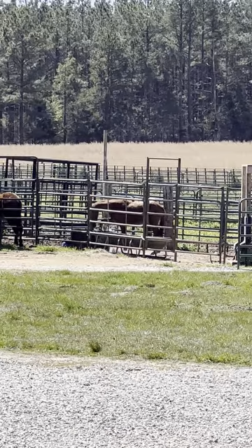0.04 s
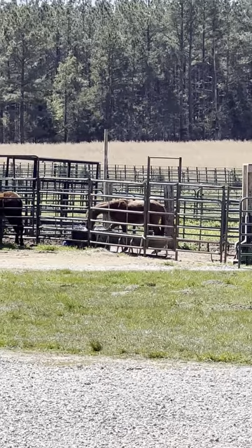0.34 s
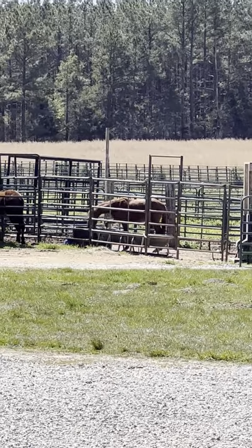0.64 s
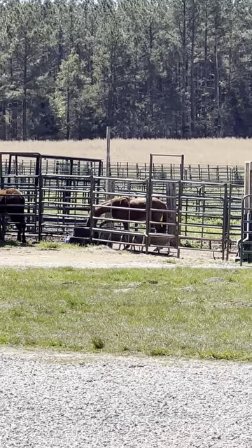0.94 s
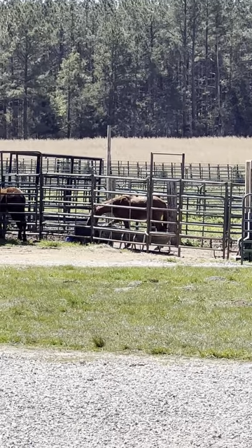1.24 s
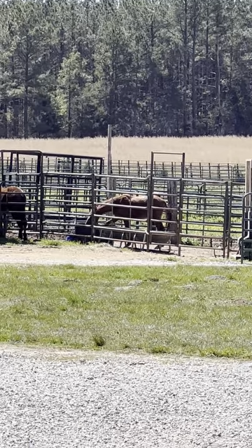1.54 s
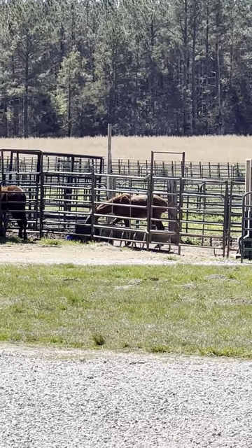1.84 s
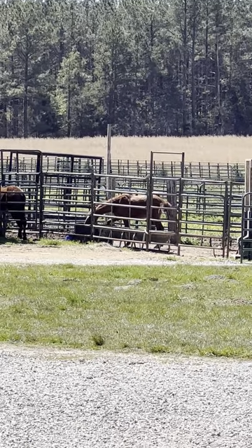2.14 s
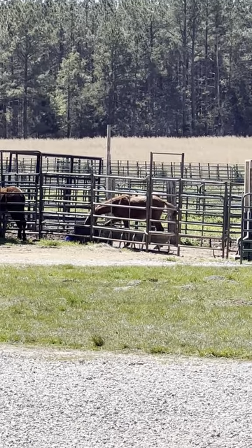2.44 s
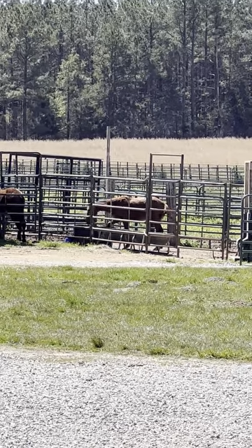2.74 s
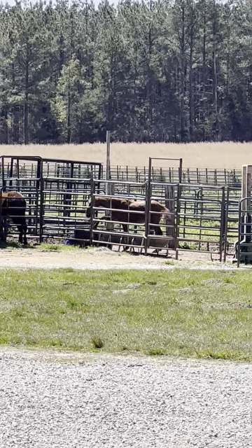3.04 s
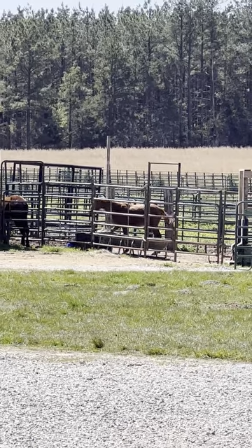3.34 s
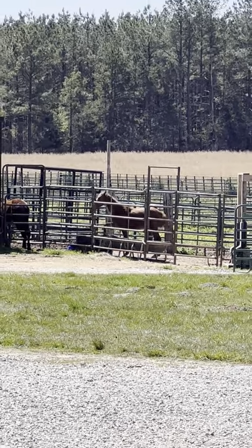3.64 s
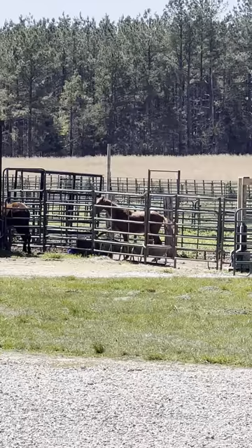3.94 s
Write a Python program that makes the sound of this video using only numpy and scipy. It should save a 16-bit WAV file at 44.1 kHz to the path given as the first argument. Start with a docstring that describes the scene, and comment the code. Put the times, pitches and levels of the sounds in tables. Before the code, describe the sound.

Faint splashing and knocks as a horse paws a distant water trough, with wind rumble.

```python
"""A yard ringed by buildings and trees, with a stereo microphone far from the water trough.
A horse paws the water, which splashes, heaves and gulps, and knocks the trough, three times clearly;
the trough rings and the yard throws the knocks back. A faint low hum sinks away early on, and a small
bird gives a few thin chirps. Wind brushes the microphone at the start and buffets it from about halfway."""
import sys
import numpy as np
from scipy import signal
from scipy.fft import rfft, irfft
from scipy.io import wavfile
from scipy.ndimage import uniform_filter1d

SR = 44100
rng = np.random.default_rng(int(sys.argv[2]) if len(sys.argv) > 2 else 0)


def bounce(signal):
    """Save signal as a 16-bit WAV file at the path given by the first command-line argument."""
    frames = np.transpose(np.atleast_2d(signal))
    limited = np.clip(frames, -1, 1)
    pcm = np.round(limited * 32767).astype(np.int16)
    wavfile.write(sys.argv[1], SR, pcm)


N = 4 * SR


def amp(db):
    """Decibels to gain."""
    return 10 ** (np.asarray(db) / 20)


def unit(x):
    """Scales to rms 1."""
    return x / np.sqrt(np.mean(x ** 2) + 1e-30)


def read(points, hz):
    """Reads a spectrum on a log-frequency axis."""
    f, value = np.transpose(points)
    return np.interp(np.log(hz + 1), np.log(f + 1), value)


def level(points):
    """Gain per sample from a dB curve."""
    return amp(np.interp(np.arange(N) / SR, *np.transpose(points)))


def add(mix, start, sound):
    """Mixes a sound in at a start in seconds."""
    part = mix[max(round(start * SR), 0):][:len(sound)]
    part += sound[:len(part)]


def colour(x, points):
    """Filters by a dB spectrum."""
    return irfft(rfft(x) * amp(read(points, np.fft.rfftfreq(len(x), 1 / SR))), len(x))


def band(x, low_hz, high_hz, low_slope, high_slope):
    """Band-pass whose skirts fall as powers of frequency."""
    f = np.fft.rfftfreq(len(x), 1 / SR) + 1
    loss = (1 + (low_hz / f) ** (2 * low_slope)) * (1 + (f / high_hz) ** (2 * high_slope))
    return irfft(rfft(x) / np.sqrt(loss), len(x))


def wander(rate_hz):
    """Smooth random motion of rms 1."""
    f = np.fft.rfftfreq(N, 1 / SR)
    return unit(irfft(rfft(rng.standard_normal(N)) * (f > 0) * np.exp(-(f / rate_hz) ** 2), N))


def strike(t, rise_s, decay_s):
    """Smooth rise, then exponential decay."""
    return np.sin(np.pi / 2 * np.minimum(t / rise_s, 1)) ** 2 * np.exp(-np.maximum(t - rise_s, 0) / decay_s)


# Still air all round the microphone. Each row: frequency in Hz, relative level in dB.
AIR_COLOUR = [(20, -6), (100, 5.5), (260, -1.5), (400, -9.5), (700, -11), (1250, -16.5), (1700, -19.5),
              (3000, -35.5), (4500, -31), (6000, -27.5), (8500, -29.5), (10500, -33), (12500, -42.5),
              (16000, -69.5)]
# How alike that air is left and right. Each row: frequency in Hz, likeness from 0 to 1.
AIR_LIKENESS = [(100, 0.6), (300, 0.91), (600, 0.3), (1100, 0), (1600, 1), (3800, .95), (5500, 0.5),
                (12000, 0.1)]

def air(level_db=-70.5, patch_db=2.5):
    """Soft outdoor background whose spectrum drifts in patches."""
    hz = np.fft.rfftfreq(1024, 1 / SR)
    noise = rng.standard_normal((5, N // 256 + 5, len(hz))).transpose(0, 2, 1)
    left, unrelated = noise[0] + 1j * noise[1], noise[2] + 1j * noise[3]
    likeness = np.clip(read(AIR_LIKENESS, hz), 0, 1)[:, None]
    right = likeness * left + np.sqrt(1 - likeness ** 2) * unrelated
    patches = unit(uniform_filter1d(uniform_filter1d(noise[4], size=10, axis=0), size=14, axis=1))
    spectra = np.array([left, right]) * amp(read(AIR_COLOUR, hz)[:, None] + patch_db * patches)
    return amp(level_db) * unit(signal.istft(spectra, nperseg=1024, noverlap=768)[1][:, :N])


# A hum in the distance, dead centre. Each row: time in seconds, level in dB.
HUM_LEVEL = [(0, -67.5), (.2, -69.5), (.6, -62), (1, -66), (1.2, -77.5), (1.6, -78), (4, -75.5)]

def hum(hz=204.4, waver=0.014):
    """A faint drone that wavers in pitch and level."""
    turns = np.cumsum(hz * (1 + waver * wander(5.8))) / SR
    return unit(np.sin(2 * np.pi * turns) * amp(3.2 * wander(22))) * level(HUM_LEVEL)


def bubbles(per_s=150, decay_cycles=20.8, pitch_rise=0.03):
    """Sparse bubbles that ring longer than drops and rise slightly in pitch."""
    out, t = np.zeros(N), np.arange(4096) / SR
    for when, pitch, size in rng.random((int(per_s * N / SR), 3)):
        hz = 1000 * 4.5 ** pitch
        age = t * hz / decay_cycles
        tone = np.sin(2 * np.pi * hz * t * (1 + pitch_rise * np.tanh(age)))
        add(out, when * N / SR, size * age * np.exp(-age) * tone)
    return unit(out)


# Falling water as it sounds across the yard. Each row: frequency in Hz, gain in dB.
WATER_COLOUR = [(300, 30), (800, 8.5), (1350, 0), (1650, 6.5), (2400, 3.5), (4000, 3.5), (5200, -0.5),
                (6200, -11), (9000, 4)]

def droplets(per_s=3200, decay_cycles=5.1, spread_db=4.5, bubble_db=-4.5, spray_db=5.5):
    """Drops of many sizes ring briefly among bubbles and fine spray."""
    drops, t = np.zeros(N), np.arange(1024) / SR
    pitches = np.geomspace(600, 9000, num=28)
    for hz in pitches:
        hits = rng.random(N) < per_s / len(pitches) / SR
        sizes = amp(spread_db * np.minimum(rng.exponential(1, N), 4))
        ring = hz * np.sin(2 * np.pi * hz * t) * np.exp(-t * hz / decay_cycles)
        drops += signal.oaconvolve(hits * sizes, ring)[:N]
    shower = unit(drops) + amp(bubble_db) * bubbles() + amp(spray_db) * rng.standard_normal(N)
    return colour(shower, WATER_COLOUR) * amp(1.2 * wander(23))


# Water running back into the far trough. Each row: time in seconds, level in dB.
TRICKLE_LEVEL = [(0, -67.5), (.6, -76), (1, -79), (1.4, -81), (1.75, -84), (2.4, -85), (3.2, -84),
                 (3.6, -84), (4, -75)]
# The horse pawing the water. Each row: start, rise and decay in seconds, level in dB,
# lower and upper band edge in Hz.
HOOF_SPLASHES = [(.0, 0.015, 0.29, -69.5, 1680, 5440), (0.146, 0.025, 0.055, -60.5, 1500, 5530),
                 (0.369, 0.024, 0.33, -71.5, 1500, 4350), (0.585, 0.025, 0.1, -72, 1490, 5250),
                 (1.13, 0.051, 0.15, -70, 1170, 3570), (1.29, 0.039, 0.049, -71, 794, 3400),
                 (1.479, 0.024, 0.051, -73.5, 1600, 3980), (1.632, 0.012, 0.022, -76, 1800, 4100),
                 (1.825, 0.017, 0.1, -76.5, 1360, 4750), (1.861, 0.059, 0.15, -68, 900, 1780),
                 (2.05, 0.032, 0.077, -78, 1885, 4340), (2.969, 0.066, 0.057, -75.5, 1720, 4100),
                 (3.332, 0.0035, 0.057, -73, 1510, 4030), (3.351, 0.071, 0.049, -70.5, 1120, 4670),
                 (3.5, 0.055, 0.13, -73, 1570, 4670), (3.678, 0.042, 0.068, -76, 1290, 3500),
                 (3.772, 0.026, 0.072, -76.5, 1400, 3600), (3.884, .03, 0.023, -70, 1520, 4940)]

def splashes(trickle_hz=(1480, 3610)):
    """Each stroke throws up a sheet of drops that rains back into the trough."""
    drops, t = droplets(), np.arange(SR) / SR
    out = unit(band(drops, *trickle_hz, 6.1, 4.2)) * level(TRICKLE_LEVEL)
    for start, rise, decay, db, low_hz, high_hz in HOOF_SPLASHES:
        sheet = np.roll(drops, rng.integers(N))[:SR]
        add(out, start, amp(db) * strike(t, rise, decay) * unit(band(sheet, low_hz, high_hz, 1.8, 6.8)))
    return out


# Heavy water moving in the far trough. Each row: time in seconds, level in dB.
SLOSH_LEVEL = [(0, -72.5), (.3, -75), (.42, -71), (.5, -70), (.58, -62.5), (.68, -59), (.8, -75),
               (.97, -86.5), (1.05, -67.5), (1.13, -66.5), (1.2, -64), (1.25, -64), (1.33, -64.5),
               (1.42, -83.5), (1.52, -63.5), (1.65, -80.5), (3.3, -76.5), (3.43, -64), (3.55, -67),
               (3.75, -56), (4, -62)]

def slosh(low_hz=223, high_hz=402, lump_db=4.5):
    """The body of water heaves against the trough walls."""
    heave = band(rng.standard_normal(N), low_hz, high_hz, 2, 5)
    return unit(heave * amp(lump_db * wander(15))) * level(SLOSH_LEVEL)


# Knocks from across the yard. Each row: start and rise in seconds, level in dB,
# gain of the ring and slop in dB, lower and upper band edge in Hz.
TROUGH_KNOCKS = [(.02, 0.0034, -62.5, -6.5, 1320, 4900), (1.826, .004, -73.5, 5.5, 1240, 5500),
                 (2.436, .004, -52.5, 0, 615, 6040), (2.507, 0.0034, -64.5, 2.5, 1400, 5200),
                 (2.699, 0.0072, -62, 7, 534, 4760), (2.862, .008, -54, -1.5, 1220, 2680),
                 (3.25, 0.0053, -69.5, 2.5, 1330, 6050), (3.332, 0.0035, -70, -6.5, 1520, 3500)]
# The trough's modes. Each row: frequency in Hz, relative level in dB, seconds to fall by 60 dB.
TROUGH_MODES = [(848, -4.5, 0.38), (937, -5, .3), (1146, -8.5, 0.31), (1293, -7.5, .18), (1548, 8, 0.15),
                (1823, 7.5, 0.096), (2113, -3.5, .27), (2650, -2.5, 0.13), (3170, -6, 0.38),
                (4230, -9, 0.16), (4710, -6.5, 0.33), (4800, -8, 0.27), (7200, -8.5, .04)]
# The colour of a blow. Each row: frequency in Hz, relative level in dB.
BLOW_COLOUR = [(300, -12.5), (600, -3), (850, -2), (1150, -5.5), (1600, -2.5), (2300, -9.5), (3300, -13.5),
               (4700, -12), (6200, -21), (7200, -12), (9000, -23.5), (13000, -27.5)]

def knocks(crack_decay_s=0.0064, ring_db=-16.5, slop_db=-6, slop_decay_s=0.048):
    """A short crack rings the trough and shakes the water in it."""
    out, t = np.zeros(N), np.arange(SR // 2) / SR
    for start, rise, db, tail_db, low_hz, high_hz in TROUGH_KNOCKS:
        crack, slop = (unit(colour(rng.standard_normal(len(t)), BLOW_COLOUR)) for _ in range(2))
        slop = band(slop, low_hz, 4450, 0.99, 2.9) * strike(t, rise, slop_decay_s)
        ring = sum(amp(mode_db - 60 * t / t60) * np.sin(2 * np.pi * (hz * t + rng.random()))
                   for hz, mode_db, t60 in TROUGH_MODES)
        tail = amp(ring_db) * ring * np.minimum(t / rise, 1) + amp(slop_db) * slop
        blow = crack * strike(t, rise, crack_decay_s) + amp(tail_db) * tail
        add(out, start, amp(db) * band(blow, low_hz, high_hz, 4.4, 1.9))
    return out


# Stereo width of the far sounds. Each row: frequency in Hz, side gain in dB.
SIDE_COLOUR = [(300, -11.5), (900, -4.5), (1300, 1.5), (1700, -19.5), (3500, -40.5), (4600, -27.5),
               (7000, 1)]

def early_reflections(x):
    """Scattered early reflections make the two channels differ."""
    scatter = rng.standard_normal(300) * np.hanning(600)[300:]
    side = colour(signal.oaconvolve(x, scatter / np.linalg.norm(scatter))[:N], SIDE_COLOUR)
    return np.array([x + side, x - side])


def yard_echo(x, delay_s=0.071, smear_s=0.004, wall_db=-13, trees_t60_s=0.47, trees_db=-18):
    """One smeared echo off a building and a thin tail from the trees."""
    t = np.arange(SR // 2) / SR
    wall, trees = rng.standard_normal((2, len(t)))
    wall *= (t > delay_s) * np.exp(-abs(t - delay_s) / smear_s)
    trees *= np.minimum(t / 0.023, 1) * amp(-60 * t / trees_t60_s)
    response = amp(wall_db) * wall / np.linalg.norm(wall) + amp(trees_db) * trees / np.linalg.norm(trees)
    return signal.fftconvolve(x, band(response, 300, 5000, 0.55, 2))[:N]


def low_cut(x, hz=87.6, q=2.13):
    """The microphone's bass cut, which rings briefly after each kick of wind."""
    w = 2 * np.pi * hz
    return signal.lfilter(*signal.bilinear([1, 0, 0], [1, w / q, w ** 2], SR), x)


def bass_lag(x, lag_s=0.00703, corner_hz=240):
    """The bass of a kick arrives late, so each one glides downward."""
    f = np.fft.rfftfreq(len(x), 1 / SR)
    turns = lag_s * corner_hz * (np.exp(-f / corner_hz) - 1)
    return irfft(rfft(x) * np.exp(2j * np.pi * turns), len(x))


# Wind rumble right on the microphone. Each row: time in seconds, level in dB.
RUMBLE_LEVEL = [(0, -65.5), (.08, -51.5), (.14, -51), (.22, -64.5), (.8, -63.5), (1.1, -69.5), (1.46, -72),
                (1.55, -50), (1.61, -59), (1.66, -44.5), (1.76, -46.5), (1.89, -54), (1.98, -47),
                (2.05, -55.5), (2.11, -39.5), (2.18, -51.5), (2.25, -35), (2.5, -42), (2.88, -37.5),
                (2.98, -46.5), (3.22, -49), (3.3, -45), (3.6, -47), (3.8, -38.5), (3.9, -49.5), (4, -48.5)]
# The colour of that rumble. Each row: frequency in Hz, relative level in dB.
RUMBLE_COLOUR = [(15, -32.5), (30, -23), (48, 8.5), (75, 2.5), (110, -5), (160, -11), (260, -20),
                 (400, -40.5), (650, -64), (1500, -89)]
# Eddies hitting the microphone. Each row: centre and length in seconds, level in dB,
# vortex frequency in Hz.
EDDIES = [(.09, .04, -54.5, 20), (1.546, 0.03, -47, 9.2), (1.635, 0.014, -38, 19), (1.667, 0.0079, -39, 10),
          (1.691, 0.011, -32, 44), (1.722, 0.014, -39, 23), (1.749, 0.0082, -29, 19),
          (1.833, 0.0047, -40, 86), (2.011, 0.0219, -50, 74), (2.135, 0.011, -37, 14),
          (2.202, 0.0037, -15.5, 71), (2.224, 0.0078, -18, 84), (2.235, 0.012, -24, 31),
          (2.275, 0.013, -32.5, 38), (2.305, 0.014, -30, 38), (2.337, 0.013, -27, 50.3),
          (2.418, 0.012, -27.5, 52.3), (2.433, .012, -27, 58), (2.585, .012, -36, 77),
          (2.606, 0.014, -33.5, 104), (2.627, 0.0068, -31.5, 89), (2.68, 0.027, -42.5, 84),
          (2.753, 0.011, -39.5, 94), (2.797, 0.0036, -35, 112), (2.858, .012, -41, 57),
          (2.891, 0.0095, -39, 70), (3.045, 0.0096, -36, 54), (3.121, .035, -48.5, 85),
          (3.262, 0.0309, -43.5, 90), (3.342, .012, -43.5, 40), (3.421, 0.031, -51, 210),
          (3.454, .035, -42.5, 134), (3.485, 0.0033, -32.5, 170), (3.505, 0.014, -47, 33),
          (3.594, 0.015, -44.5, 117), (3.687, 0.0051, -41, 195), (3.725, .028, -52.5, 137),
          (3.785, .011, -35, 98), (3.831, 0.013, -32, 96), (3.84, 0.011, -29.5, 43), (3.87, 0.025, -43, 90),
          (3.917, 0.01, -40, 140), (3.955, .025, -45.5, 127)]

def wind(lump_db=3, vortex_gap_s=0.013, spread_db=3.5, eddy_band_hz=(34.9, 440)):
    """Lumpy rumble, and eddies of pressure kicks: the tighter the vortex, the higher it reaches."""
    flow = colour(rng.standard_normal(N), RUMBLE_COLOUR)
    flow /= np.sqrt(uniform_filter1d(flow ** 2, size=2000) + 1e-20)  # even out the noise's own swells
    out = unit(flow * amp(lump_db * wander(21.5))) * level(RUMBLE_LEVEL)
    t = np.arange(-SR // 8, SR // 8) / SR
    for centre, length, db, hz in EDDIES:
        count = 1 + int(length / vortex_gap_s)
        kicks = np.zeros(len(t))
        for k, (size, turn, late) in enumerate(rng.random((count, 3))):
            arrival = length * (k + late - .5) / count
            pulse = np.exp(2j * np.pi * turn) / (1 + 2j * np.pi * hz * (t - arrival)) ** 2
            kicks += amp(spread_db * (2 * size - 1)) * pulse.real
        eddy = bass_lag(low_cut(band(kicks, *eddy_band_hz, 1.0, 3.15)))
        add(out, centre + t[0], amp(db) * eddy * np.sqrt(length * SR / np.sum(eddy ** 2)))
    return out


def microphone_wind(whistle_hz=9740, whistle_db=-64, side_db=-26):
    """The wind differs a little between the ports; a thin whistle rides on its pressure."""
    pressure = wind()
    whistle = np.sin(2 * np.pi * whistle_hz * np.arange(N) / SR) * wander(120) * pressure
    return pressure + amp(whistle_db) * whistle + amp(side_db) * wind() * np.array([[1], [-1]])


# Hollow gulps in the far trough. Each row: start and swell in seconds, level in dB,
# first and last pitch in Hz.
TROUGH_GULPS = [(.385, 0.011, -56.5, 417, 240), (0.552, 0.0046, -52.5, 402, 190),
                (0.599, .013, -49.5, 260, 155), (0.64, 0.012, -41, 390, 130), (0.8, 0.011, -47.5, 190, 122),
                (1.021, 0.0058, -64.5, 380, 254), (1.046, 0.008, -56.5, 355, 159),
                (1.154, 0.0076, -65, 397, 322), (1.228, 0.0095, -60, 400, 340),
                (1.303, 0.0079, -51, 442, 324), (1.303, 0.015, -55, 226, 176)]

def gulps(glide_s=0.00516, roughness=0.23):
    """A pocket of air in the heaving water booms briefly while its pitch falls."""
    out, t = np.zeros(N), np.arange(SR // 6) / SR
    for start, swell, db, start_hz, end_hz in TROUGH_GULPS:
        hz = end_hz + (start_hz - end_hz) * np.exp(-t / glide_s)
        tone = np.sin(2 * np.pi * (np.cumsum(hz) / SR + rng.random()))
        churn = unit(band(rng.standard_normal(len(t)), end_hz, start_hz, 1.7, 6.4))
        envelope = (t / swell * np.exp(1 - t / swell)) ** 3
        add(out, start, amp(db) * envelope * (tone + roughness * churn))
    return out


# A small bird, far off in the leaves. Each row: start and length in seconds, level in dB,
# first and last pitch in Hz.
BIRD_CHIRPS = [(1.463, .06, -87, 10260, 10060), (1.532, 0.015, -80, 8150, 9400),
               (1.56, 0.053, -78, 7360, 8450), (3.518, 0.043, -76, 5340, 5180),
               (3.592, 0.076, -88.5, 8000, 7400)]

def bird(waver=0.015, smear_s=0.017):
    """Thin, unsteady glides that move fast at first, then settle; foliage smears them."""
    out = np.zeros(N)
    for start, length, db, start_hz, end_hz in BIRD_CHIRPS:
        progress = np.arange(0, length, 1 / SR) / length
        glide = end_hz + (start_hz - end_hz) * (1 - progress) ** 3
        hz = glide * (1 + waver * wander(400)[:len(glide)])
        add(out, start, amp(db) * np.sin(np.pi * progress) * np.sin(2 * np.pi * np.cumsum(hz) / SR))
    t = np.arange(SR // 10) / SR
    leaves = rng.standard_normal(len(t)) * np.exp(-t / smear_s)
    return signal.oaconvolve(out, leaves / np.linalg.norm(leaves))[:N]


def scene(water_echo_db=-16):
    """The distant trough and its echoes, under wind at the microphone."""
    water = splashes() + slosh() + gulps()
    sharp = knocks() + bird()
    far = water + sharp + yard_echo(sharp + amp(water_echo_db) * water)
    return early_reflections(far) + air() + hum() + microphone_wind()


def record(dry):
    """The recorder's band limit."""
    low_pass = signal.firwin(255, cutoff=15500, window=("kaiser", 9), fs=SR)
    return signal.oaconvolve(dry, low_pass[None], "same")


dry = scene()
out = record(dry)
bounce(out)
```